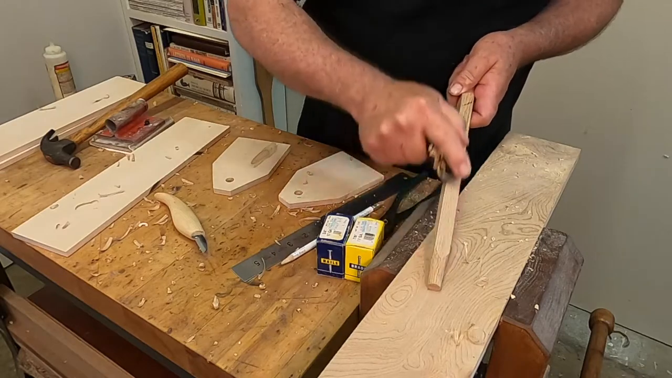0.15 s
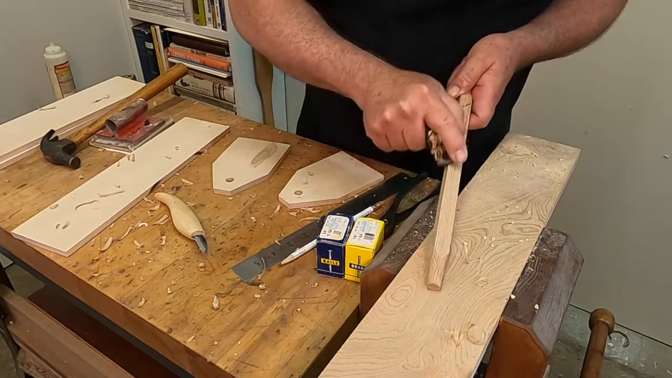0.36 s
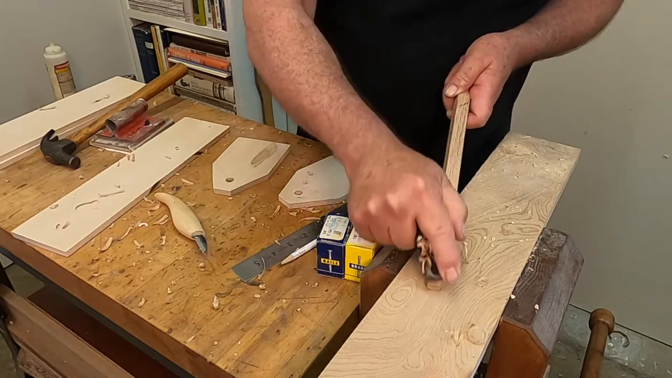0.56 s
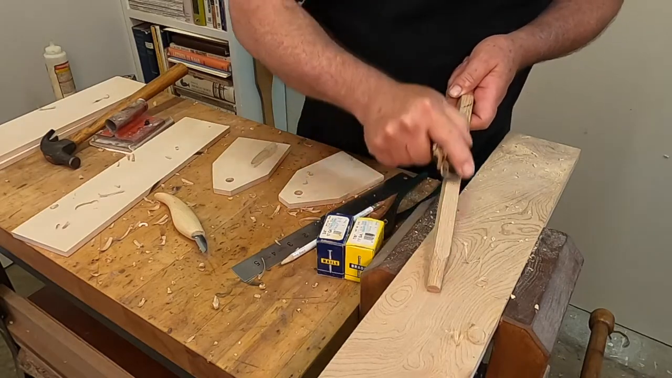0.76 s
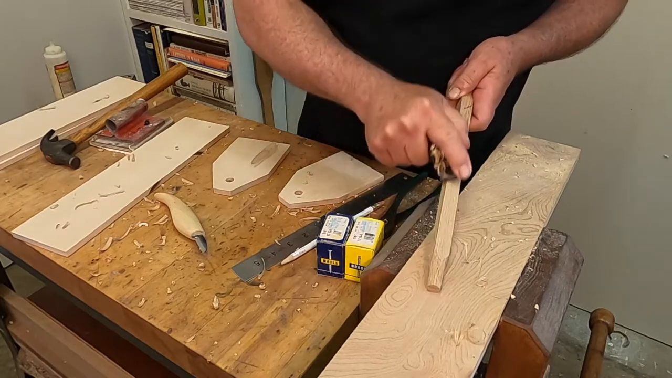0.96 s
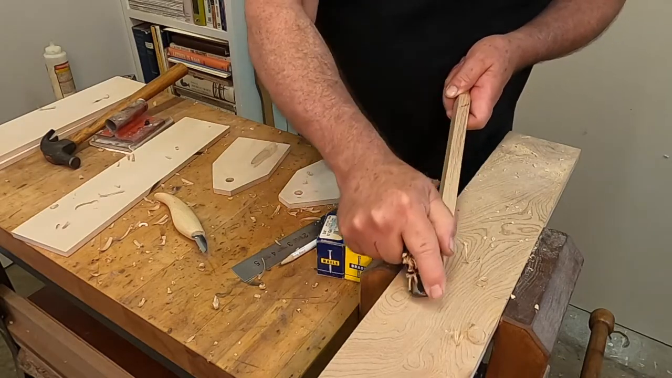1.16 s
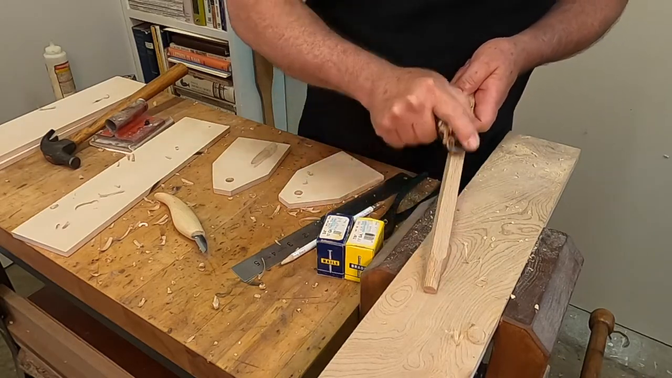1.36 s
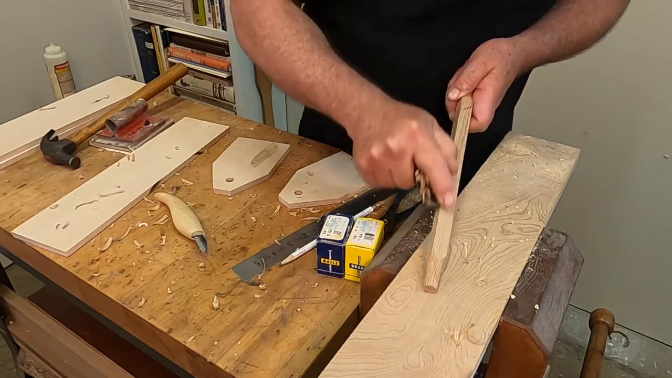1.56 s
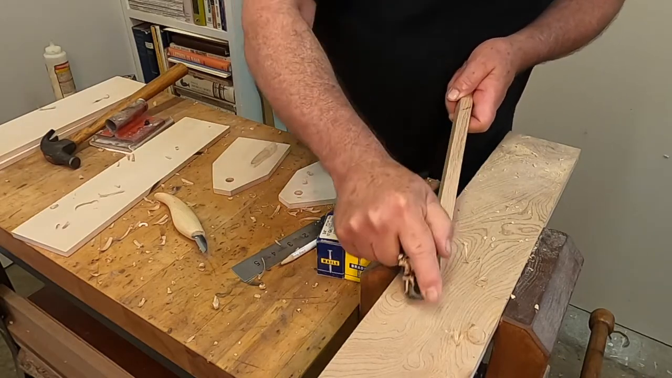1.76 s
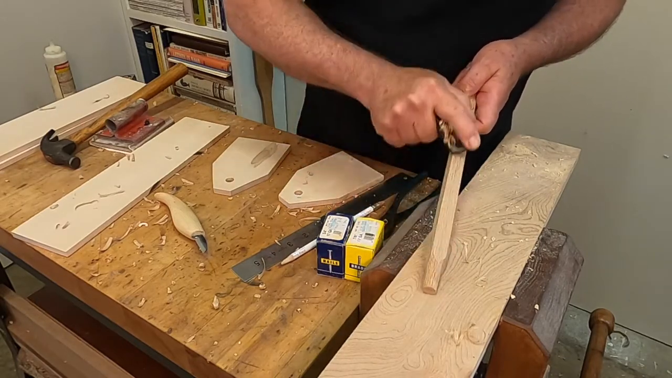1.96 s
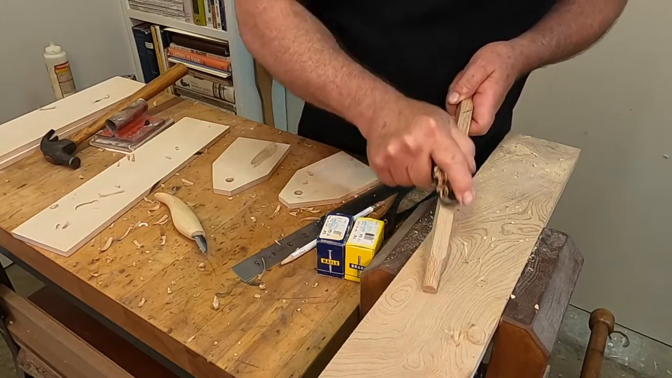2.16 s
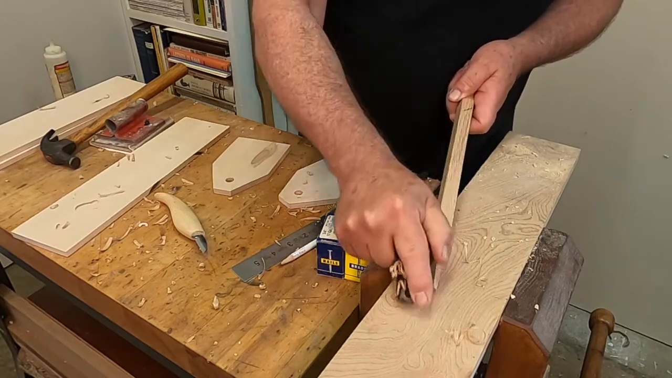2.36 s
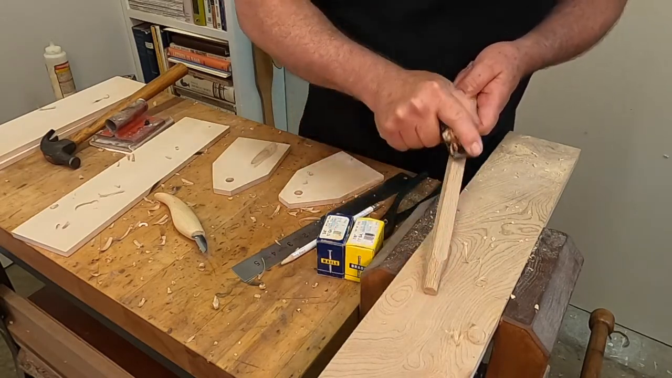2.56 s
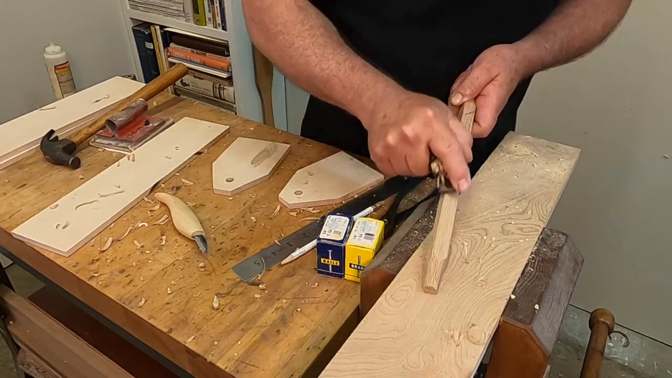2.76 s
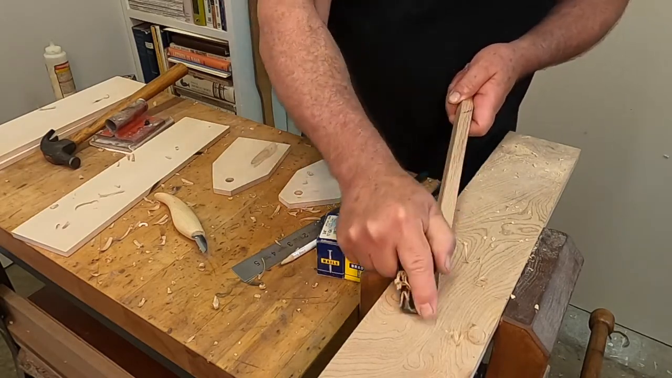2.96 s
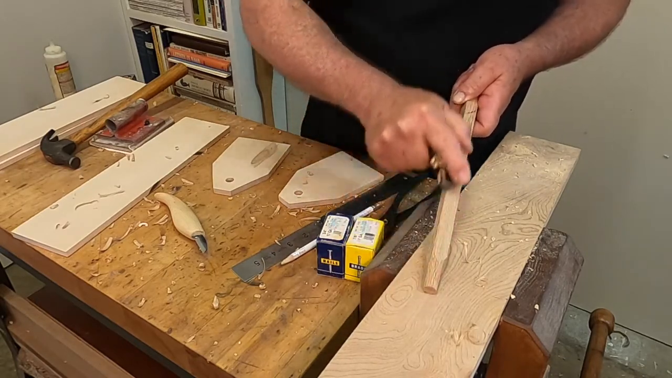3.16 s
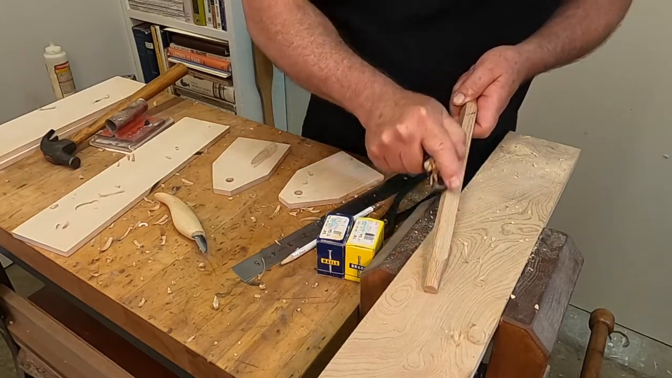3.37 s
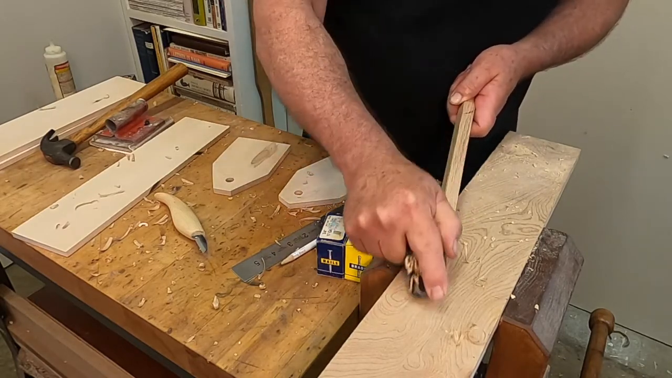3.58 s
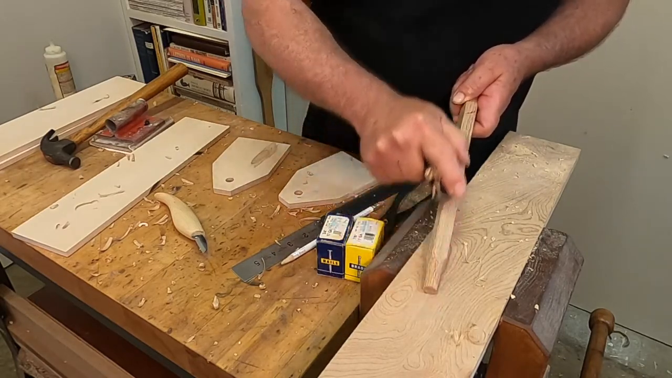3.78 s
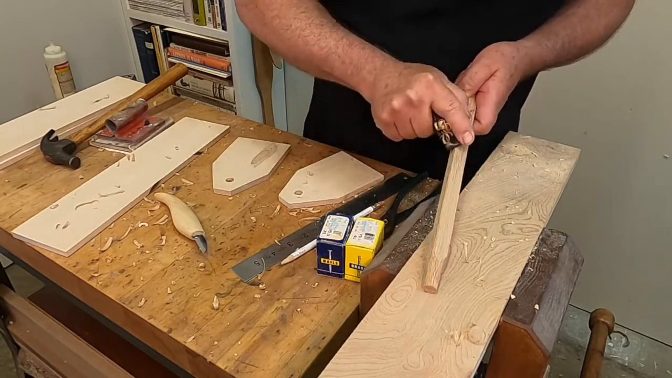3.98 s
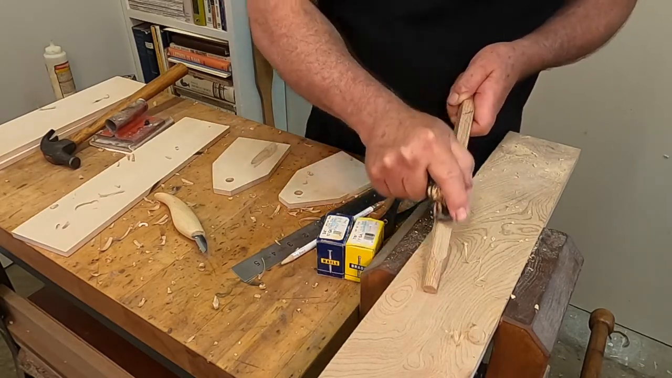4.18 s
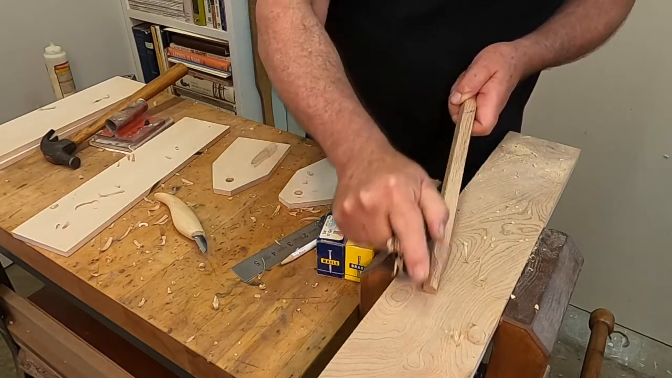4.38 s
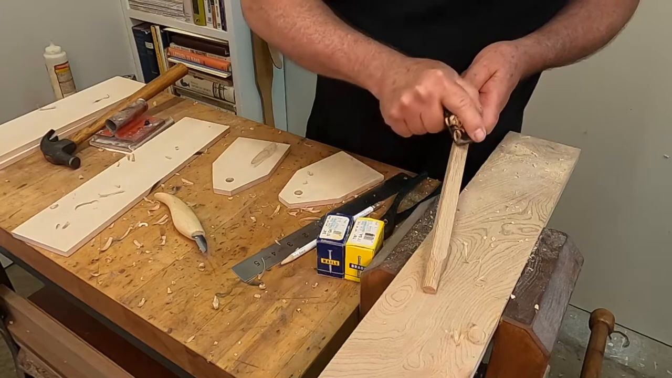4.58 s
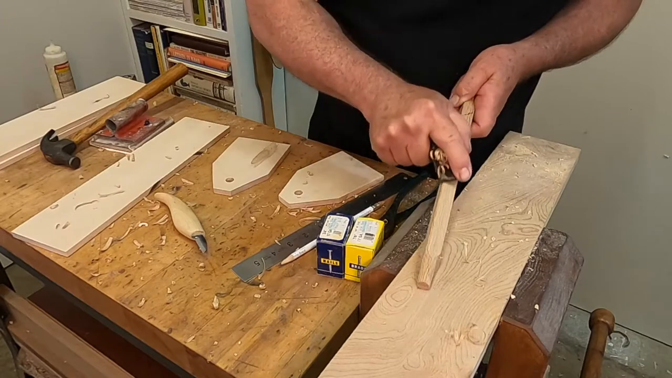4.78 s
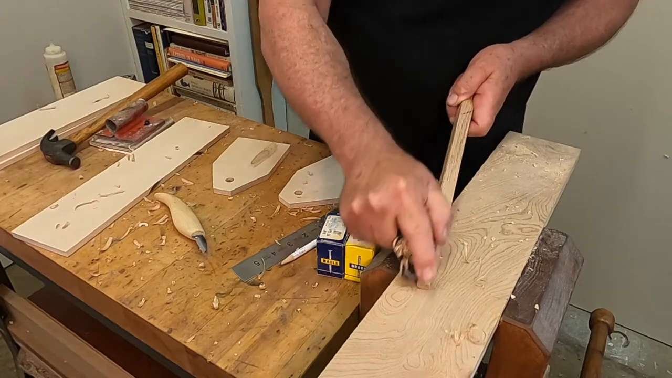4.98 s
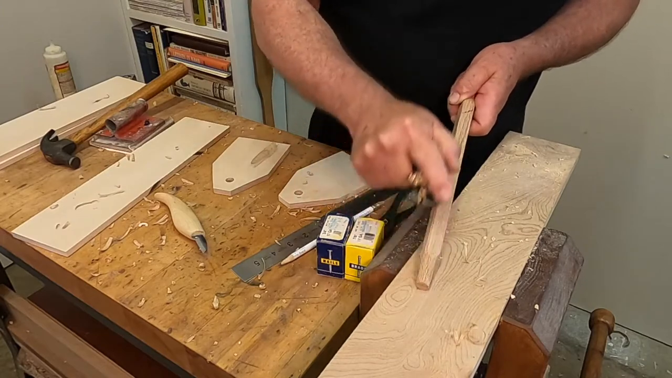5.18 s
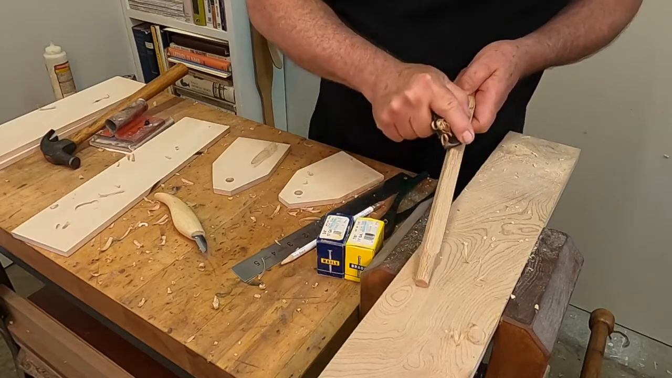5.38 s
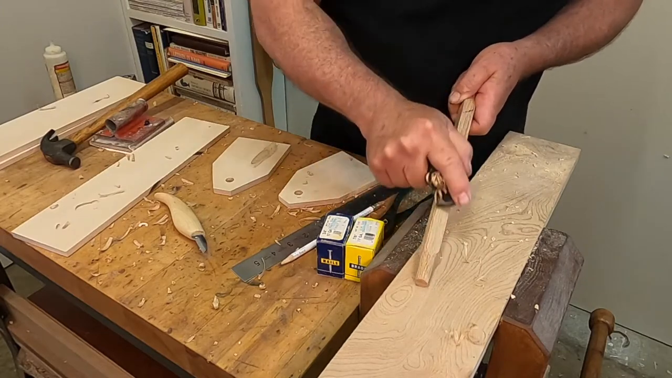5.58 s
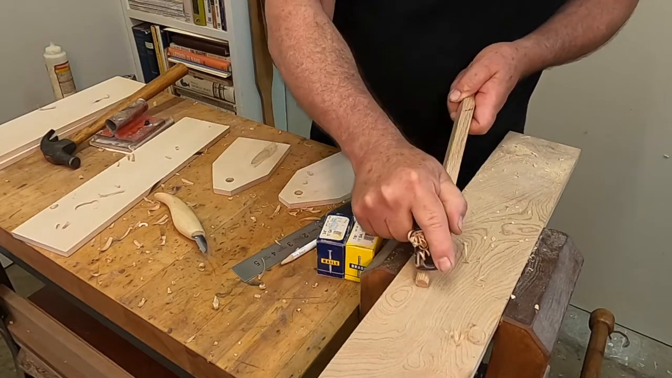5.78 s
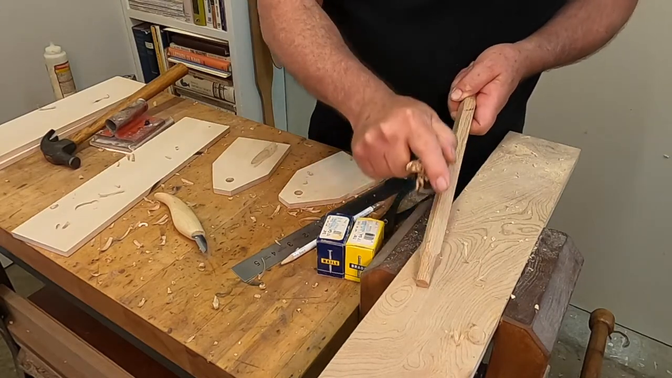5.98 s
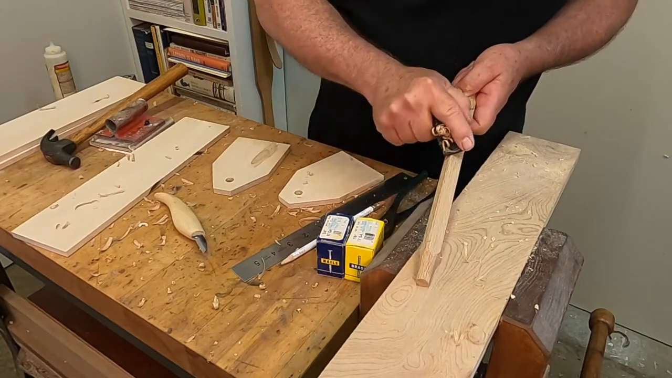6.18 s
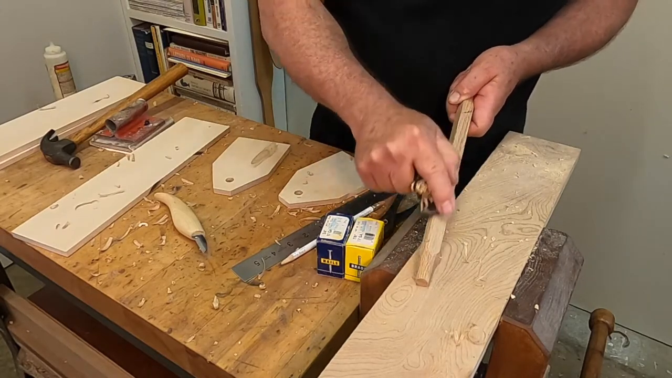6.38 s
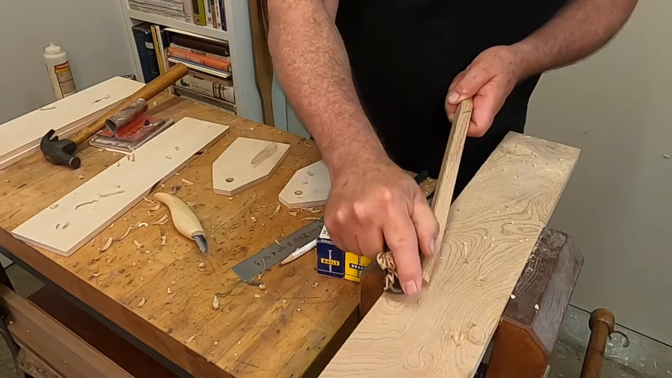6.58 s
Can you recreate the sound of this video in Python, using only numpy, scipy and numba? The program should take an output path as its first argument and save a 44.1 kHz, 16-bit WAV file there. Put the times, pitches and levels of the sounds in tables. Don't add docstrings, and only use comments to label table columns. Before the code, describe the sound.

Close in a small workshop, a hand plane shaves a thin stick braced on a board. Each quick pass lands with a hard bright tick, slides briefly, then bites into a hollow, ringing, fibrous scrape with crisp hiss and tiny squeaks. Short dull rubs and knocks of the stick's foot follow. Passes start fast and irregular, then settle to a steady rhythm over a low distant machine hum that sinks under loud moments.

```python
import sys
import numpy as np
from scipy import signal
from scipy.fft import rfft, irfft, next_fast_len
from scipy.io import wavfile
from scipy.ndimage import uniform_filter1d, map_coordinates
from numba import njit

SR = 44100
rng = np.random.default_rng(int(sys.argv[2]) if len(sys.argv) > 2 else 0)


def how_loud(loudness_db):
    steps = np.asarray(loudness_db, float) / 20
    return 10 ** steps


def unload_wav(signal):
    wavfile.write(
        sys.argv[1],
        SR,
        np.round(np.clip(np.atleast_2d(signal).T, -1, 1) * 32767).astype(np.int16),
    )


N = 292559
T = np.arange(N) / SR

# frequency in Hz, density in dB per Hz.
AIR_SPECTRUM = [(20, -21), (50, 8.5), (75, -9.5), (130, -6.5), (250, -11.5), (480, -9), (800, -24),
                (1500, -17), (2800, -26.5), (5000, -27), (10000, -33), (16000, -41)]
# frequency in Hz, width in Hz, level in dB.
MACHINE_HUM = [(62, 4.6, -61), (124.3, 3.4, -52), (149, 11, -56), (171, 6, -54), (297.5, 4.8, -55)]
AIR_DB = -51.5

# start in seconds, end in seconds.
PASSES = [(-.3, .135), (.32, .657), (.8, .92), (.96, 1.215), (1.33, 1.5), (1.53, 1.778), (1.99, 2.385),
          (2.665, 3.017), (3.29, 3.662), (3.955, 4.373), (4.69, 5.09), (5.4, 5.782), (6.21, 6.6)]
FREE_HZ, LOADED_HZ = (809.7, 1652), (849, 1740)
DETUNE_BEND = .7

# start in seconds, end in seconds, first mode level in dB,
# second mode level in dB.
SLIDES = [(0.0, 0.073, -32, -28.5), (0.294, 0.507, -32, -27), (0.803, 0.945, -29, -26),
          (1.34, 1.61, -28, -26.5), (1.985, 2.185, -28, -23), (2.673, 2.793, -32, -26.5),
          (3.29, 3.51, -28, -25.5), (3.968, 4.096, -28, -23.5), (4.688, 4.82, -30.5, -26.5),
          (5.412, 5.545, -34.5, -28.5), (6.21, 6.347, -31, -37.5)]
GRIT_DB = [-2, 3.5, 9, -2, 3.5, -4.5, -4, -1.5, 4.5, -6, 10]
SLIDE_FADE_DB, SETTLE_DB, SETTLE_S = -2.5, 6.5, 0.0034
SLIDE_RASP_DB, SLIDE_THRUM_DB = -22, -20.5

# bite in seconds, leave in seconds.
BITES = [(0.0, .135), (.405, .657), (.82, .92), (.985, 1.215), (1.375, 1.5), (1.55, 1.778), (2.14, 2.385),
         (2.76, 3.017), (3.382, 3.662), (4.05, 4.373), (4.775, 5.09), (5.48, 5.782), (6.3, 6.6)]
# deepest point in seconds, rasp level in dB, relative entry level in dB.
CUTS = [(0.018, -39, 40), (.5, -26.5, -9), (.858, -28, -10), (1.07, -22.5, -13.5), (1.42, -28.5, -1.5),
        (1.739, -28, -3), (2.23, -22, -14), (2.9, -23, -14.5), (3.61, -26.5, -9.5), (4.34, -19.5, -18),
        (5.04, -22.5, -18.5), (5.62, -24, -17.5), (6.55, -23.5, -15.5)]
# loudest point in seconds, first mode level in dB, second mode
# level in dB, board thrum level in dB, relative entry level in dB.
FLEX = [(.11, -39, -37, -29.5, -33), (.6, -35, -26.5, -21, 4.5), (.85, -27, -15, -33, 5),
        (1.1, -25.5, -23, -24.5, -1.5), (1.42, -25, -18, -47, 4.5), (1.75, -31, -25.5, -23, -12),
        (2.33, -21, -20.5, -20, -3.5), (2.98, -24, -20, -25, -5.5), (3.641, -23, -21.5, -28.5, -16),
        (4.27, -21.5, -17.5, -21, -10), (4.93, -20.5, -23, -25, -8.5), (5.67, -15.5, -17.5, -27.5, -18),
        (6.45, -29, -24, -23.5, -6)]
FINENESS_DB = [-4, -2, -0.5, -1.5, -3, 1.5, -4.5, -2, 3.5, 0.5, -0.5, -3.5, 1]
CATCH_S, FREE_S = .022, .012
EASE, CUT_SAG_DB_PER_S = 1.24, -34
FLEX_SAG_DB_PER_S, THRUM_ENTRY_DB = (-40, -15), -3.5
FIZZ_DB, FIZZ_FALL_DB = -9.5, -3.5
IDLE_FIZZ_DB = -7
TEAR_DB = -1

# start in seconds, end in seconds, first mode level in dB,
# board thrum level in dB.
RUBS = [(0.646, 0.713, -45, -18), (1.21, 1.307, -31, -27.5), (1.782, 1.838, -49, -27),
        (2.394, 2.484, -22, -33), (3.078, 3.16, -34, -22.5), (3.662, 3.763, -32.5, -27),
        (4.389, 4.486, -27, -26), (5.087, 5.199, -28, -28.5), (5.779, 5.941, -20.5, -17.5),
        (6.599, 6.632, -33, -14)]
SCUFF_DB = [1, 16, 10, -11, 15, 11, 3, 0, -16, 0]
RUB_FADE_DB, RUB_THRUM_FADE_DB, RUB_HIGH_DB, RUB_RASP_DB = -9, -5.5, -6.5, -23.5
RUB_HZ = 774, 460

# time in seconds, gain of all layers in dB, length in seconds.
GRAIN = [(0.452, 6, 0.008), (0.544, 5, 0.043), (0.583, 3, 0.019), (0.626, 6.5, 0.054), (0.836, 1.5, 0.021),
         (0.898, -21, 0.022), (1.087, -4, 0.013), (1.176, 2.5, 0.039), (1.453, -5, 0.083),
         (1.602, 6, 0.007), (1.746, 3, 0.15), (2.23, -3, 0.014), (2.351, 6, 0.029), (2.867, 4, 0.026),
         (2.973, -2, 0.014), (3.008, 3, 0.011), (3.59, -8, 0.01), (3.625, -0.5, 0.013), (3.654, 6.5, 0.021),
         (4.293, -17, 0.015), (4.355, 3, 0.02), (4.862, 3.5, 0.12), (4.926, 3, 0.025), (5.635, -2, 0.07),
         (5.777, 3.5, 0.051), (5.815, 2, 0.0073), (5.866, -12, 0.029), (6.346, -3, 0.0087),
         (6.401, -1, .008), (6.545, 4, 0.0092), (.05, -14, 0.014)]
GRAIN_SHARE = [
    [0.98],
    [1],
    [0.13],
    [0.72],
]
# time in seconds, gain in dB, length in seconds.
HIGH_SWELLS = [(.07, 13.5, 0.011), (.97, -5.5, 0.029), (1.05, -7, 0.034), (1.43, 9.5, 0.034), (1.53, -5, 0.053),
               (1.75, 1, .04), (2.05, 9.5, 0.052), (3.45, -11, 0.046), (4.0, -4.5, 0.056), (4.81, -4, 0.065),
               (4.95, 7.5, 0.087), (5.55, 6, 0.043), (5.77, -8.5, 0.019)]
# time in seconds, rasp gain in dB, length in seconds.
RIPS = [(.446, 7, 0.012), (.49, 4, 0.0097), (.513, 2, 0.01), (.47, -2, 0.015), (1.012, 8, .01),
        (1.043, -1, .008), (1.062, -14, 0.0083), (1.088, 2, 0.011), (1.385, 8, 0.0091), (1.425, 1, 0.024),
        (1.597, 4, 0.0087), (1.61, -10, 0.014), (1.66, 3, 0.033), (1.69, 2.5, 0.019), (1.73, 5.5, 0.012),
        (2.17, 1, .01), (2.185, -6, 0.0094), (2.214, -3, 0.009), (2.238, 5, 0.017), (2.315, -6, 0.034),
        (2.335, 1.5, 0.019), (2.83, 8.5, 0.014), (2.924, 5, 0.011), (2.968, 8, 0.015), (2.988, 8.5, 0.012),
        (3.47, 5.5, 0.01), (3.546, 2.5, 0.022), (3.59, 2, 0.022), (3.622, 1, 0.012), (4.11, 8, 0.031),
        (4.165, -9, .015), (4.222, 3, .012), (4.263, 1, 0.0092), (4.313, -10, 0.012), (4.347, -4, 0.015),
        (4.885, 5.5, 0.025), (4.963, -3, .01), (5.02, -10, 0.011), (5.047, -7, 0.0096), (5.59, 0.5, 0.02),
        (5.738, 4, 0.016), (5.76, 2.5, 0.019), (6.364, 4.5, 0.0087), (6.384, 1, 0.014), (6.476, 2.5, .008),
        (6.496, -1, .01), (6.542, -1, 0.0096), (6.568, 2, 0.011)]

# frequency in Hz, width in Hz, gain in dB.
FIXED_MODES = [(510, 10.3, 8.5), (664, 3.6, 16), (673.5, 18.6, -26), (800, 22, 7.5), (1006, 4.1, 11),
               (1060, 44, -0.5), (1083, 20, 6), (1252, 210, -2), (1630, 130, 6), (1738, 93, 4),
               (2003, 50, 10), (2406, 69, 13)]
# frequency in Hz, width in Hz, gain in dB.
IRON_RINGS = [(7000, 340, 3.5), (10100, 160, 8), (12100, 1200, 3)]
# frequency in Hz, density in dB per Hz.
SHAVING_SPECTRUM = [(1240, -20.5), (2100, 2.5), (2470, -2.5), (2800, -1), (3500, -6.5), (3810, -1),
                    (4400, -2.5), (5040, -13), (5390, -7), (7020, -10.5), (8320, -18.5), (12300, -29.5),
                    (16000, -41)]

# time in seconds, peak level in dB, pitch in Hz.
LOW_SNAGS = [(.011, -18, 848), (.076, -28, 805), (.109, -24, 825), (.122, -22, 780), (0.503, -9.5, 807),
             (0.549, -18, 880), (0.614, -10, 849), (0.635, -9, 885), (0.853, -19.5, 780), (1.075, -13, 808),
             (1.175, -15, 882), (1.471, -22, 765), (1.697, -22, 850), (1.741, -16, 855), (1.996, -15, 866),
             (2.289, -11.5, 864), (2.353, -7, 898), (2.784, -30, 770), (2.811, -12, 802), (2.866, -13, 823),
             (2.92, -17, 774), (2.938, -19, 823), (3.006, -11, 877), (3.109, -21, 920), (3.139, -25, 802),
             (3.648, -11.5, 798), (4.215, -10.5, 872), (4.273, -13, 795), (4.835, -15, 937),
             (4.856, -9.5, 800), (4.895, -10.5, 875), (4.919, -8.5, 775), (4.995, -17, 878),
             (5.532, -15, 794), (5.622, -12.5, 793), (5.758, -10.5, 843), (5.773, -8.5, 849),
             (5.81, -6.5, 855), (5.847, -16, 867), (5.887, -22, 828), (5.911, -19, 830), (6.262, -24, 830),
             (6.32, -18.5, 833), (6.357, -14, 796), (6.375, -11.5, 800), (6.407, -14.5, 787),
             (6.46, -24, 805), (6.478, -14, 834), (6.56, -12, 792), (6.575, -15, 850)]
# time in seconds, peak level in dB, pitch in Hz.
HIGH_SNAGS = [(.068, -18, 1700), (.075, -17, 1570), (0.1023, -20, 1740), (.11, -10.5, 1680),
              (.121, -19, 1700), (0.444, -21, 1700), (0.53, -5, 1780), (0.5431, -4.5, 1810),
              (0.614, -15, 1700), (0.6347, -6, 1683), (0.81, -11, 1860), (0.834, -1, 1600),
              (0.8545, -6.5, 1563), (0.87, -13, 1840), (0.922, -16, 1560), (1.3686, -11, 1710),
              (1.402, -6.5, 1583), (1.419, -2, 1680), (1.4344, -7.5, 2050), (1.4707, -7, 1820),
              (1.588, -11, 2140), (1.69, -12, 1930), (1.706, -9, 1750), (1.7345, -6, 1967),
              (1.753, -7, 1700), (1.772, -10, 1640), (2.0378, -11, 1920), (2.051, -13, 1740),
              (2.0624, -15, 1600), (2.083, -7, 1664), (2.195, -8, 1740), (2.2285, -13, 1740),
              (2.2432, -6.5, 1746), (2.27, -22, 1710), (2.9323, -7, 1710), (3.0039, -11, 1790),
              (3.537, -13, 1650), (3.9858, -15, 1620), (4.2385, -3.5, 1630), (4.335, -10, 1700),
              (4.9033, -8, 1590), (4.9352, -7, 1580), (4.959, -12, 1720), (5.033, -13, 1630),
              (5.615, -9, 1585), (5.684, -8, 1520), (5.718, -8, 1650), (6.2851, -20, 1740),
              (6.4383, -18, 1830), (6.3237, -15.5, 1990), (6.3588, -10, 1716), (6.412, -14, 2060),
              (6.4674, -13, 2260), (6.558, -9.5, 1700), (6.587, -10.5, 1700)]
SNAG_PEAK_S, SNAG_DB = (0.0047, 0.0025), (-1.5, -5.5)

# frequency in Hz, t60 in seconds.
SHOP_DECAY = [(300, 0.66), (800, 0.51), (1800, 0.42), (3000, 0.52), (5000, 0.49), (12000, 0.41)]

# time in seconds, second mode peak in dB, then relative
# levels in dB of first mode, third mode and crack.
TICKS = [(0.0233, -9.5, 1, -10, 1), (0.283, 5, -12.5, -20.5, -17.5), (0.3098, -2.5, -1.5, -4.5, -7),
         (0.8, -4.5, -1, -31, -26), (0.9102, -8.5, -20, -10, -19), (1.3193, 2, -5, -16.5, -13),
         (1.9796, 2, -8.5, -12, -9.5), (1.9858, 0.5, -11, -19, -10), (2.6552, 5, -11, -11.5, -7.5),
         (3.0498, -13, 13, -1, 0), (3.2844, 5, -14, -57, -15.5), (3.314, -10.5, -32, -17, -12),
         (3.9476, 0.5, -3.5, -5.5, -5.5), (3.9624, -6.5, -10, -14, -12), (4.4205, -16, 8.5, -2.5, 0),
         (4.6806, 5, -11, -8.5, -15), (4.6892, -7, -35, -8, -3), (5.1356, -19, 13.5, -0.5, 6),
         (5.3919, -2.5, -0.5, 0, 1.5), (5.3959, 0, -18, -52, -19), (6.2038, -6, -1.5, -19, -13.5),
         (6.358, -18.5, -15, 2, 8), (6.5979, -1, -12, -30, -7)]
# frequency in Hz, t60 in seconds.
STICK_MODES = [(820.3, 0.077), (1635, 0.023), (2380, 0.0088), (2063, 0.028), (1512, 0.0087), (880, 0.044),
               (1700, 0.083)]
# frequency in Hz, density in dB per Hz.
CRACK_SPECTRUM = [(2000, 10.5), (3500, 19.5), (6500, 1.5), (10000, -3), (16000, -24)]
# frequency in Hz, t60 in seconds, level in dB.
BOARD_MODES = [(159.3, 0.83, 4), (312, 0.46, -5.5), (444, 0.49, 1.5)]
THUMP_DB, FOOT_DB = -45.5, 14.5
CONTACT_LAG_S = 0.00043

# time in seconds, peak level in dB, pitch in Hz.
SQUEAKS = [(0.445, -10, 4130), (0.506, -13, 4730), (1.057, -10, 4420), (1.077, -4.5, 4920),
           (1.172, -8.5, 2450), (1.421, -13.5, 7130), (1.7245, -7, 2356), (1.7472, -12, 2795),
           (2.161, -20, 7000), (2.211, -13, 4770), (2.266, -15, 4290), (2.275, -16.5, 7000),
           (2.2332, -6, 4420), (2.241, -9, 2694), (2.325, -7.5, 3860), (2.343, -14, 4320),
           (2.959, -8, 4216), (2.9807, -9.5, 3130), (3.537, -16, 5800), (3.548, -14.5, 4470),
           (3.58, -12, 4310), (3.591, -5, 4450), (3.614, -7, 3460), (4.2207, -11.5, 4520),
           (4.2547, -9, 2810), (4.302, -16, 4480), (4.956, -10.5, 2650), (5.013, -8.5, 4180),
           (5.04, -7, 3880), (5.585, -10.5, 2930), (5.682, -15, 2870), (6.375, -11.5, 4250),
           (6.489, -12, 4400), (6.535, -3.5, 4060), (6.561, -7, 4500)]
SQUEAK_LEAD_S, SQUEAK_S = .003, 0.01806

# start in seconds, end in seconds, start pitch in Hz,
# end pitch in Hz, level in dB.
WISPS = [
    (3.883, 3.957, 5300, 6350, -50),
    (6.22, 6.302, 6740, 5800, -55),
]

SUSTAIN_DB, SUSTAIN_S = -14.5, 0.092


def unit(x):
    return x / np.sqrt(np.mean(np.abs(x) ** 2) + 1e-20)


def along(points, hz):
    f, v = np.transpose(points)
    return np.interp(np.log(hz + 1), np.log(f + 1), v)


def bumps(peaks, f):
    return sum(db / (1 + (2 * (f - c) / w) ** 2) for c, w, db in peaks)


def humps(rows):
    return sum(np.interp(T, (s - length, s, s + length), (0, db, 0)) for s, db, length in rows)


def travel(spans):
    edges = np.ravel(list(spans))
    return np.interp(T, edges, np.arange(len(edges)) % 2)


def wobble(rate_hz):
    return map_coordinates(rng.standard_normal(int(N * rate_hz / SR) + 4), [T * rate_hz])


def filtered(x, response):
    m = next_fast_len(len(x) + SR // 4)
    return irfft(rfft(x, m) * response(np.fft.rfftfreq(m, 1 / SR)), m)[:len(x)]


def narrow(hz, width_hz, skirt_db, even=0):
    shape = lambda f: 1 / (1 + (2 * f / width_hz) ** 2) + how_loud(skirt_db) / (1 + f / 400)
    a, b = (filtered(rng.standard_normal(N), shape) for _ in range(2))
    phase = 2 * np.pi * np.cumsum(hz * np.ones(N)) / SR
    power = unit(a * a + b * b) + 0.23
    return unit((a * np.cos(phase) + b * np.sin(phase)) * power ** (-np.clip(even, 0, 1) / 2))


def patchy(x, depth_db, band_db=0):
    z = signal.stft(x, nperseg=256)[2]

    def field(bins, frames):
        rough = rng.standard_normal(z.shape)
        return unit(uniform_filter1d(uniform_filter1d(rough, size=bins, axis=0), size=frames, axis=1))

    gain_db = 2 * depth_db * np.tanh(field(4, 4) / 2) + 2 * band_db * np.tanh(field(3, 30) / 2)
    return signal.istft(z * how_loud(gain_db), nperseg=256)[1][:N]


def swell(start, crest, end, entry_db, exit_db, rise_s, fall_s):
    out, part = np.zeros(N), slice(max(int(start * SR), 0), int((end + fall_s) * SR))
    t = T[part]
    to_go = np.clip((crest - t) / (crest - start + 1e-4), 0, 1)
    past = np.clip((t - crest) / (end - crest), 0, 1)
    gate = np.clip(np.minimum((t - start) / rise_s, 1 + (end - t) / fall_s), 0, 1)
    out[part] = gate * how_loud(entry_db * to_go ** EASE + exit_db * past)
    return out


@njit
def follower(level, release):
    out, held = np.empty_like(level), 0.0
    for i in range(len(level)):
        held = max(level[i], held * release)
        out[i] = held
    return out


def background(duck, hush):
    air = filtered(patchy(rng.standard_normal(N), depth_db=0.5), lambda f: how_loud(along(AIR_SPECTRUM, f)))
    treble = filtered(air, lambda f: 1 / (1 + (900 / (f + 1)) ** 6))
    mains = how_loud(-38) * np.sin(2 * np.pi * 59.8 * T)
    hum = mains + sum(how_loud(db) * narrow(hz, width_hz, -88) for hz, width_hz, db in MACHINE_HUM)
    scale = how_loud(AIR_DB) / np.std(treble)
    bass = scale * (air - treble) + hum
    return hush * scale * treble + duck * how_loud(-1.0 + 0.11 * wobble(5.0)) * bass


def slide_power():
    power = np.zeros((4, N))
    for (a, b, low_db, high_db), grit_db in zip(SLIDES, GRIT_DB):
        settle = how_loud(SETTLE_DB * np.exp(-np.abs(T - a) / SETTLE_S))
        shape = swell(a, a, b, 0, SLIDE_FADE_DB, 0.0024, 0.044) * settle
        levels_db = [low_db, high_db, low_db + SLIDE_THRUM_DB, high_db + SLIDE_RASP_DB + grit_db]
        power += (how_loud(levels_db)[:, None] * shape) ** 2
    return power


def bite_power():
    power = np.zeros((4, N))
    for (a, b), cut, flex in zip(BITES, CUTS, FLEX):
        deep, rasp_db, entry_db = cut
        loud, low_db, high_db, thrum_db, soft_db = flex
        for k, db in enumerate((low_db, high_db)):
            sag_db = FLEX_SAG_DB_PER_S[k] * (b - loud)
            power[k] += (how_loud(db) * swell(a, loud, b, soft_db, sag_db, 0.0086, 0.011)) ** 2
        power[2] += (how_loud(thrum_db) * swell(a, loud, b, THRUM_ENTRY_DB, 0, 0.059, 0.013)) ** 2
        thinning_db = CUT_SAG_DB_PER_S * (b - deep)
        shaving = swell(a, deep, b - FREE_S, entry_db, thinning_db, CATCH_S, FREE_S)
        power[3] += (how_loud(rasp_db) * shaving) ** 2
    return power


def rub_power():
    power = np.zeros((4, N))
    for a, b, low_db, thrum_db in RUBS:
        ring = swell(a, a, b, 0, RUB_FADE_DB, 0.016, 0.024)
        scrub = swell(a, a, b, 0, RUB_THRUM_FADE_DB, 0.016, 0.024)
        power += np.array([how_loud(low_db) * ring, how_loud(low_db + RUB_HIGH_DB) * ring,
                           how_loud(thrum_db) * scrub, how_loud(thrum_db + RUB_RASP_DB) * scrub]) ** 2
    return power


def effort():
    power = slide_power() + bite_power() + rub_power()
    return np.sqrt(power) * how_loud(np.array(GRAIN_SHARE) * humps(GRAIN))


def ringing_wood(low_gain, high_gain, thrum_gain, bite):
    down = travel(PASSES) ** DETUNE_BEND
    low_hz, high_hz = (top + (foot - top) * down for top, foot in zip(FREE_HZ, LOADED_HZ))
    low_hz = low_hz * (1 + 0.00805 * wobble(25))
    high_hz = high_hz * (1 + 0.044 * wobble(30))
    thrum_hz = RUB_HZ[0] + (RUB_HZ[1] - RUB_HZ[0]) * travel(r[:2] for r in RUBS)

    low = how_loud(2.8 * bite + 2.1 * wobble(60)) * narrow(low_hz, width_hz=165, skirt_db=-25.5, even=0.76)
    high = how_loud(4.56 * bite + 1.18 * wobble(90)) * narrow(high_hz, width_hz=396, skirt_db=-49, even=0.89)
    thrum = how_loud(1.7 * bite) * narrow(thrum_hz, width_hz=410, skirt_db=-63)

    wood = low_gain * how_loud(2.0) * unit(low)
    wood += high_gain * how_loud(-3.5 + humps(HIGH_SWELLS)) * unit(high)
    wood += thrum_gain * how_loud(-1.5) * unit(thrum)
    return filtered(wood, lambda f: how_loud(bumps(FIXED_MODES, f) - 3.5) / (1 + (400 / (f + 1)) ** 8))


def shaving_hiss(rasp_gain, bite):
    cutting = sum(swell(a - .02, a, b, 0, 0, 0.013, 0.064) for a, b in BITES).clip(0, 1)
    bite_index = np.searchsorted([a for a, b in BITES[1:]], T)
    fizz_db = FIZZ_DB + FIZZ_FALL_DB * travel(BITES) + np.array(FINENESS_DB)[bite_index]
    fizz_db += IDLE_FIZZ_DB * (1 - cutting)

    tear_db = TEAR_DB * np.clip(wobble(120) - .7, 0, 1.5)
    snap_db = 4.9 * rng.standard_normal(N) + 1.0 * bite + 0.61 * wobble(250) + tear_db
    fibres = patchy(rng.standard_normal(N) * how_loud(snap_db), depth_db=3.5, band_db=2.67)
    hiss = filtered(fibres, lambda f: how_loud(along(SHAVING_SPECTRUM, f) + bumps(IRON_RINGS, f)
                                          + 0.38 * bumps(FIXED_MODES, f)))
    fizz = filtered(hiss, lambda f: 1 / (1 + (8000 / (f + 1)) ** 6))
    rip_db = humps(RIPS)
    return rasp_gain * how_loud(1.03 + rip_db) * (unit(hiss - fizz) + how_loud(fizz_db - 0.24 * rip_db) * unit(fizz))


def bench_scuff(thrum_gain):
    shake_db = humps((a + 0.036, db, .11) for (a, *_), db in zip(RUBS, SCUFF_DB))
    return thrum_gain * how_loud(-25.0 + shake_db + 4.4 * wobble(10)) * narrow(240, width_hz=630, skirt_db=-50)


def strokes():
    low_gain, high_gain, thrum_gain, rasp_gain = effort()
    bite = 2.24 * np.tanh(wobble(55) / 2.9)
    wood = ringing_wood(low_gain, high_gain, thrum_gain, bite)
    return wood + bench_scuff(thrum_gain) + shaving_hiss(rasp_gain, bite)


def snags():
    out, t = np.zeros(N + SR), np.arange(2500) / SR
    for rows, peak_s, rel_db in zip((LOW_SNAGS, HIGH_SNAGS), SNAG_PEAK_S, SNAG_DB):
        u = t / (1.57 * peak_s)
        envelope = (u * np.exp(1 - u)) ** 2
        for s, db, hz in rows:
            ring = envelope * np.sin(2 * np.pi * hz * t)
            out[round((s - 1.1 * peak_s) * SR):][:len(t)] += how_loud(db + rel_db) * ring
    return out[:N]


def shop(x):
    out, hop = np.zeros(N + 2 * SR), SR // 4
    for i in range(0, N, hop):
        hz, t, z = signal.stft(rng.standard_normal(SR // 2), SR, nperseg=256)
        decay = how_loud(-60 * t / along(SHOP_DECAY, hz)[:, None])
        tail = signal.istft(z * decay, SR, nperseg=256)[1]
        wet = signal.fftconvolve(x[i:i + hop], tail / np.linalg.norm(tail))
        out[i + 300:][:len(wet)] += wet
    return out[:N]


def ticks():
    out, t = np.zeros(N + SR), np.arange(SR // 4) / SR
    luck = rng.standard_normal((len(TICKS), len(t)))
    for (s, db, low_db, third_db, crack_db), noise in zip(TICKS, luck):
        ring = np.zeros(len(t))
        mode_db = (low_db - 1.5, .1, third_db + 11.0, third_db, -7, low_db - 7.0, -15)
        for (hz, t60), rel_db, detune in zip(STICK_MODES, mode_db, noise):
            onset = 1 - np.exp(-t * hz ** 2 / 1900)
            tone = np.sin(-2 * np.pi * hz * (1 + 0.033 * detune) * t)
            ring += how_loud(rel_db - 60 * t / t60) * onset * tone

        dull = lambda f: .12 * min(db, 0) * np.log2(np.maximum(f / 4000, 1))
        crack = unit(filtered(noise, lambda f: how_loud(along(CRACK_SPECTRUM, f) + dull(f))))
        ring += how_loud(crack_db - 4.5 - 60 * t / 0.011) * crack

        drift = 6 * uniform_filter1d(noise, 400)
        thump = sum(how_loud(rel_db - 60 * t / t60) * np.sin(2 * np.pi * hz * t + drift)
                    for hz, t60, rel_db in BOARD_MODES)
        foot_knock = low_db > 0
        ring += how_loud(THUMP_DB + FOOT_DB * foot_knock - db) * thump * (1 - np.exp(-t / 0.0078))

        rise_s = .0003 * how_loud(-min(db + low_db * foot_knock, 0))
        rise = 1 - np.exp(-t / rise_s)
        gain_drop = 0.45 + 0.52 / (1 + (t / 0.0079) ** 6)
        out[round((s + CONTACT_LAG_S) * SR):][:len(t)] += how_loud(db + 1.0) * ring * rise * gain_drop
    return out[:N]


def squeaks():
    out = np.zeros(N + SR)
    u = np.arange(3000) / SR / SQUEAK_S
    luck = rng.standard_normal((len(SQUEAKS), 3000))
    for (s, db, hz), jitter in zip(SQUEAKS, luck):
        pitch_hz = hz * (1.08 - 0.1645 * u + 0.37 * uniform_filter1d(jitter, 30))
        whistle = np.sin(np.pi * np.minimum(u, 1)) * np.sin(2 * np.pi * np.cumsum(pitch_hz) / SR)
        out[round((s - SQUEAK_LEAD_S) * SR):][:3000] += how_loud(db - 6.0) * whistle
    return out[:N]


def wisps():
    out = np.zeros(N)
    for a, b, from_hz, to_hz, db in WISPS:
        glide_hz = np.interp(T, (a, b), (from_hz, to_hz))
        hiss = narrow(glide_hz, width_hz=570, skirt_db=-60)
        out += how_loud(db) * swell(a, a, b, 0, 0, .015, .015) * hiss
    return out


def bass_gain(direct, cutting):
    slow = follower(np.abs(direct), how_loud(-62 / SR))
    deep = uniform_filter1d(1 / (1 + (slow / how_loud(1.0)) ** 4), size=900, origin=400)
    low_power = filtered(cutting, lambda f: f < 1200) ** 2
    steady = np.abs(uniform_filter1d(low_power, round(SUSTAIN_S * SR)))
    return deep / (1 + (follower(steady, how_loud(-220 / SR)) / how_loud(2 * SUSTAIN_DB - 5)) ** 5)


def hiss_gain(knocks):
    held = follower(np.abs(knocks), how_loud(-55 / SR))
    return uniform_filter1d(1 / (1 + (held / how_loud(-2.5)) ** 2), size=900, origin=400) ** 0.62


def scene():
    knocks, cutting = ticks(), strokes() + squeaks() + snags()
    direct = knocks + cutting
    held = follower(np.abs(direct), how_loud(-110 / SR))
    duck = uniform_filter1d(1 + (held / how_loud(-6.5)) ** 2, 200)
    deep, hush = bass_gain(direct, cutting), hiss_gain(knocks)
    room = shop(how_loud(-11.0) * knocks + how_loud(-8.5) * cutting)
    room = filtered(room, lambda f: how_loud(bumps([(2900, 490, 9.4)], f)))
    room = deep ** 0.5 * hush ** 0.22 * duck ** -.4 * room
    return (direct + wisps() + room + duck ** -.3 * background(deep, hush))[None]


def band_limit(x):
    return signal.sosfilt(signal.butter(12, 15900, fs=SR, output="sos"), x)


def record(dry):
    clipped = dry / (1 + np.abs(dry) ** 20) ** (1 / 20)
    return band_limit(clipped)


dry = scene()
out = record(dry)
unload_wav(out)
```